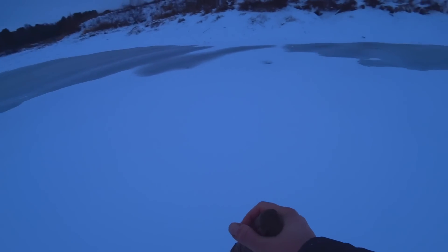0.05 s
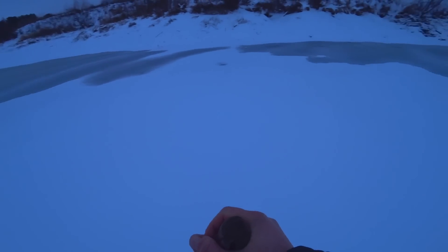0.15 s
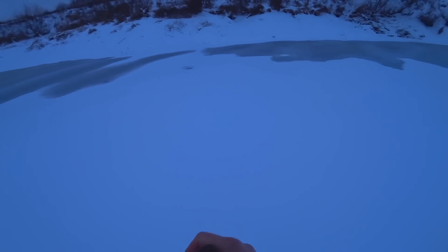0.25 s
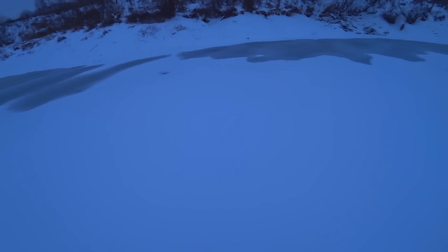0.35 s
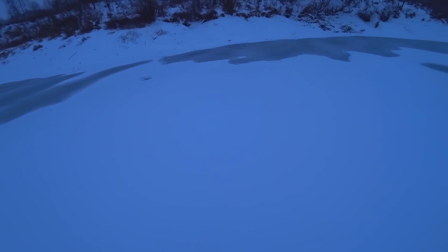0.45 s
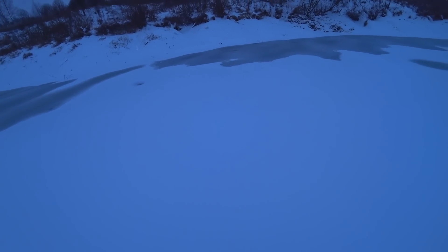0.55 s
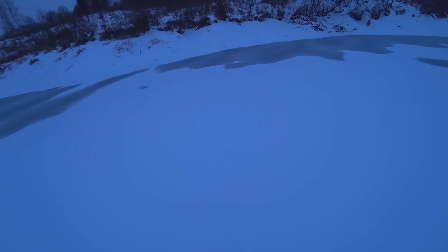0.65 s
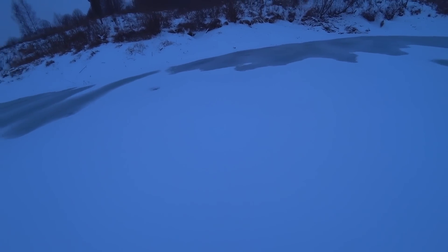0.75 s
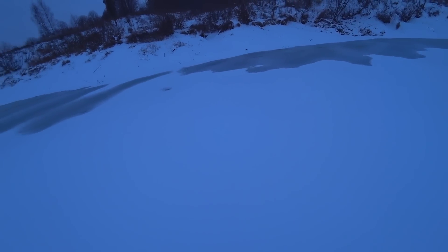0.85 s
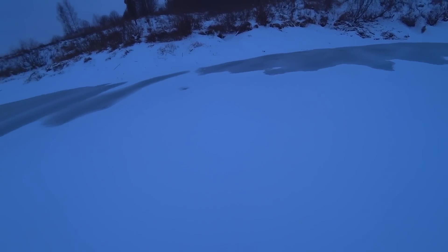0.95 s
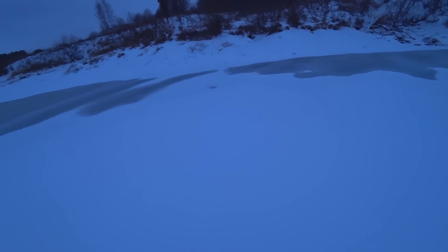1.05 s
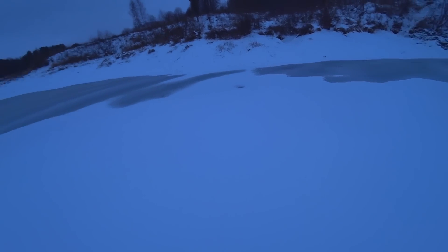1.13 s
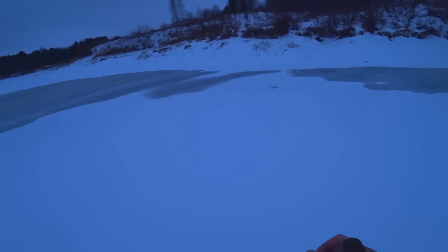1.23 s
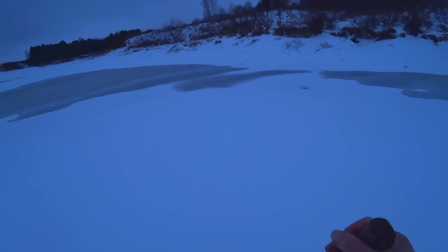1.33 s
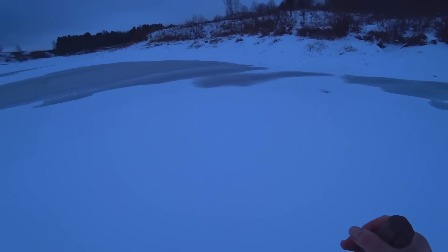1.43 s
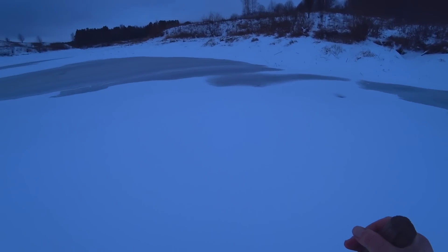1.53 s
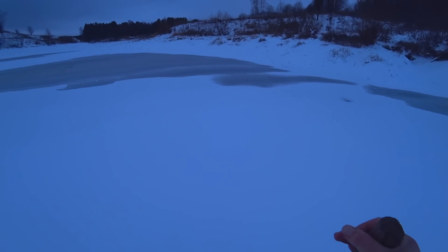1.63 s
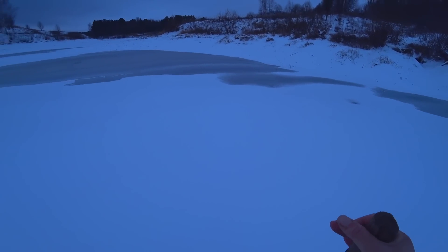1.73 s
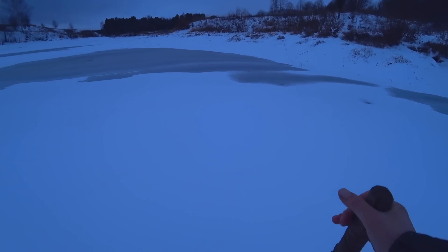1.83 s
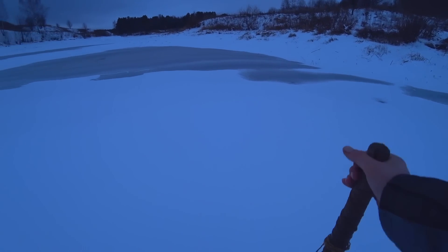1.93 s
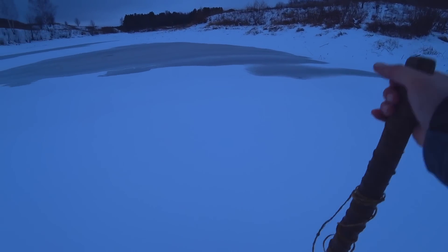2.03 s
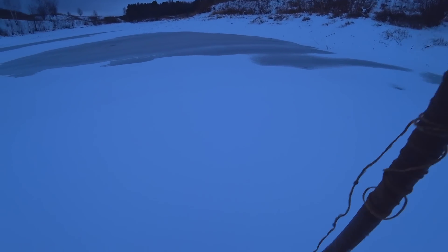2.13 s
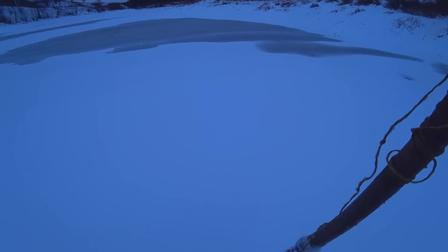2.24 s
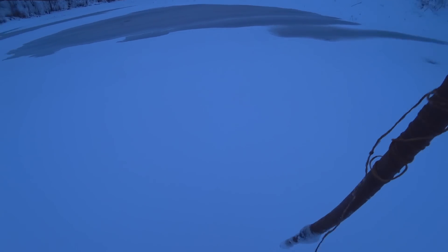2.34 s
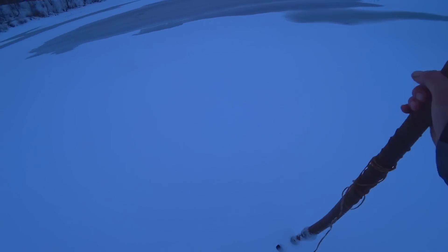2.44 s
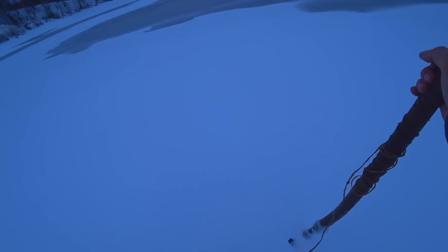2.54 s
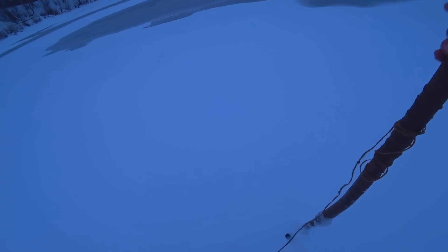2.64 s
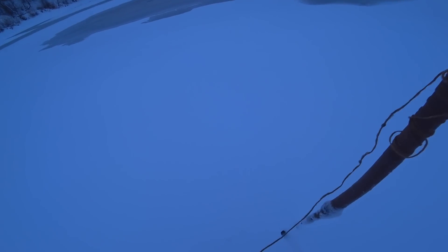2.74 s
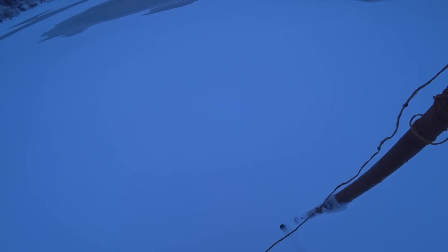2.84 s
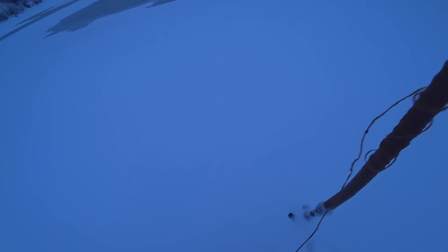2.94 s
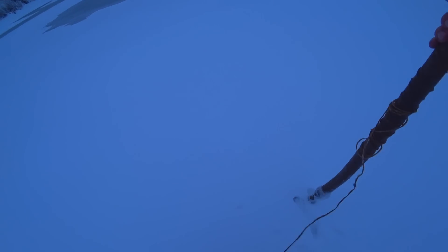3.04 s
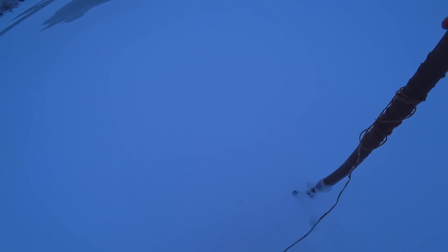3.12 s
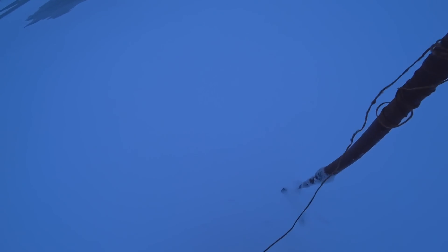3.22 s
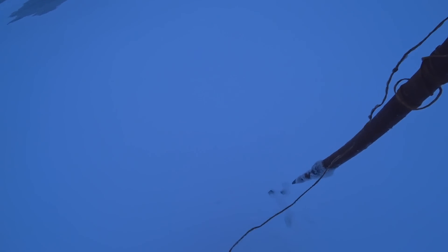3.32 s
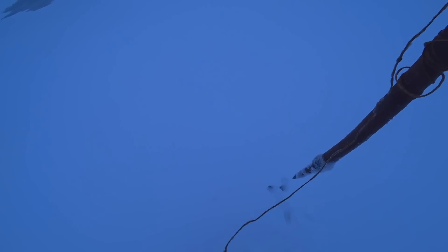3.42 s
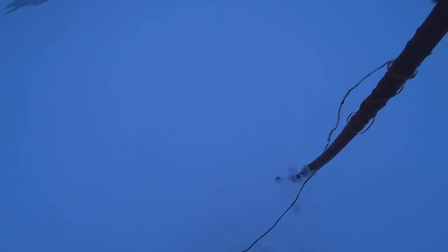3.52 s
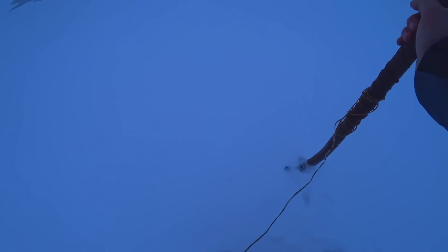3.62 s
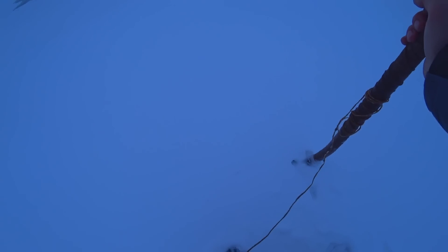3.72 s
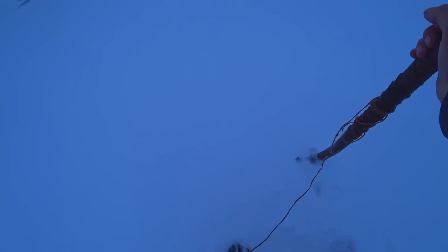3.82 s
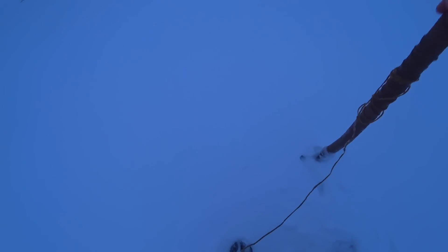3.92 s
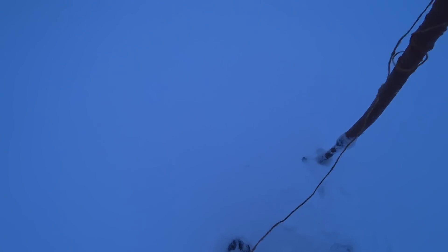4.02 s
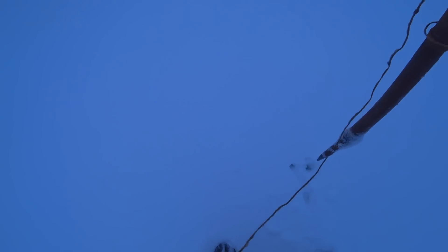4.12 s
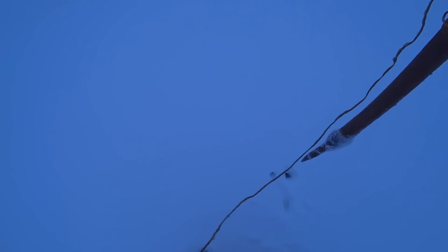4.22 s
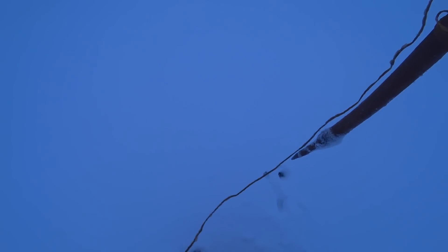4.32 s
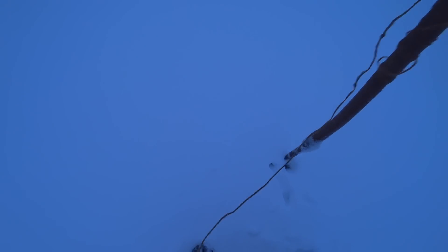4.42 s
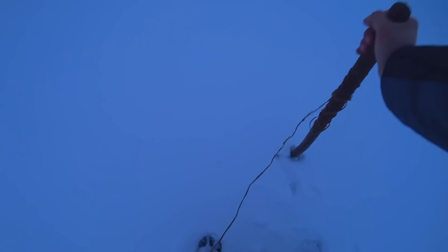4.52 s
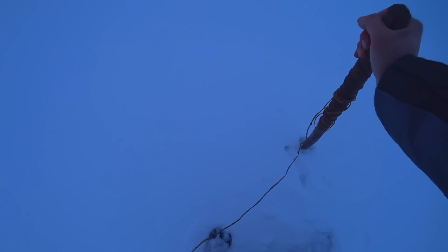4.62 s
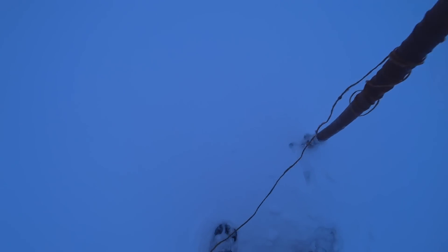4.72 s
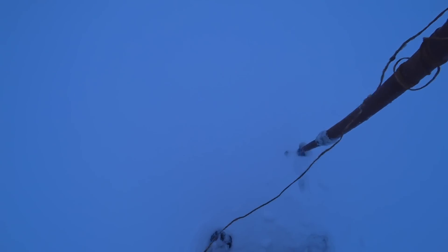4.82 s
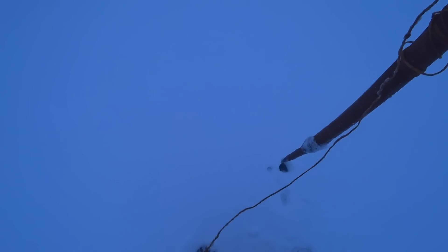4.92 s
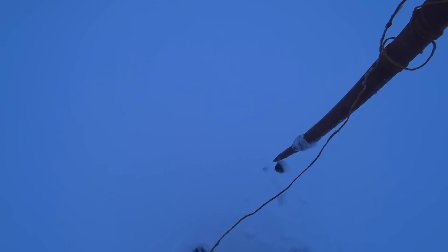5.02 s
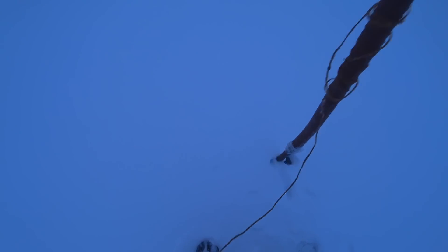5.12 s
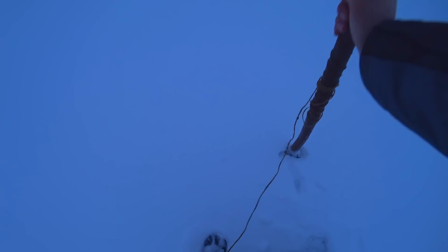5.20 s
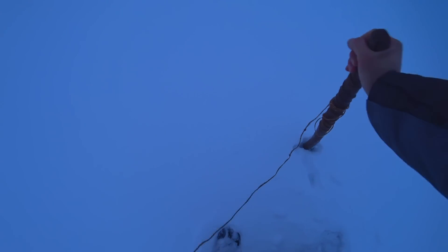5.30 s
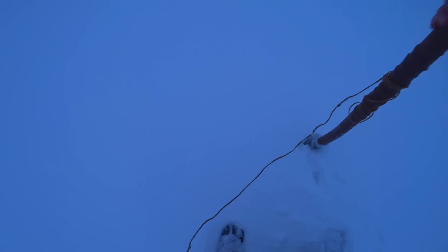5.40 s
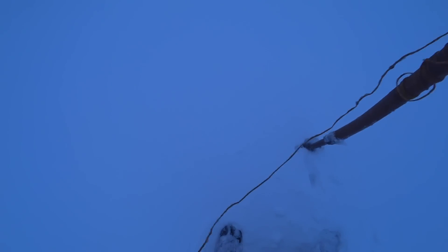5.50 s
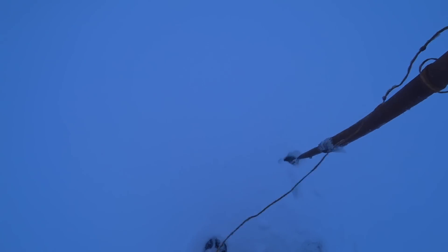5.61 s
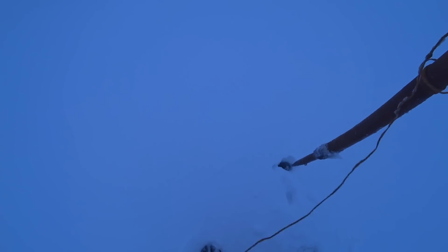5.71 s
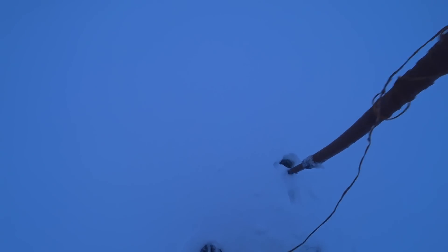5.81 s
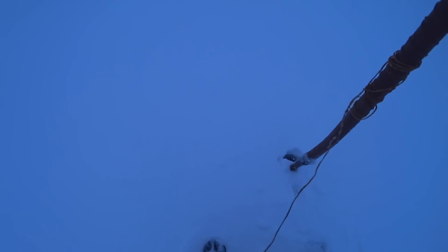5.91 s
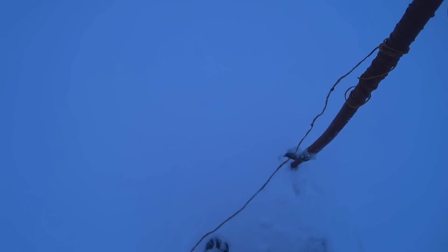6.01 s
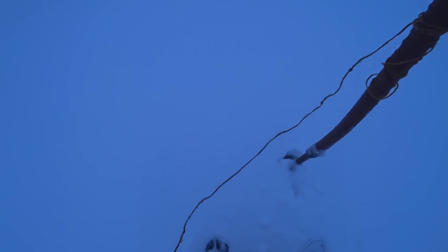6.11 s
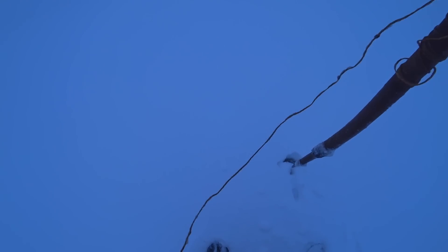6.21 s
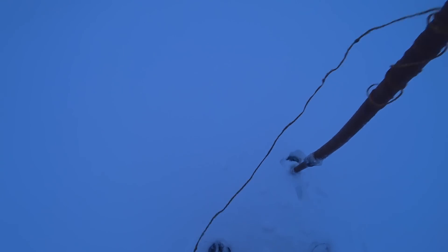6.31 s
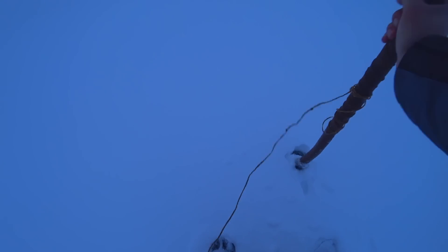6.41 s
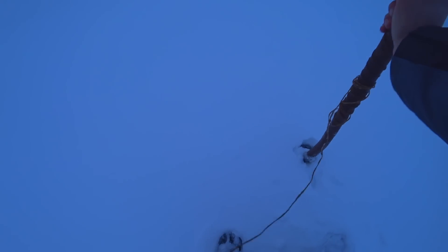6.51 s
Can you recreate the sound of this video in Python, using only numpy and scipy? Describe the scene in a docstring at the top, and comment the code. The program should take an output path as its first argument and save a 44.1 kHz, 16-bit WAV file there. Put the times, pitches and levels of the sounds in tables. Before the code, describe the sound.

A steel ice chisel on a wooden pole strikes snow-covered ice, close and dry, with no echo. The first sharp crack comes at about 0.4 seconds. For the next two seconds things are quieter: boots shuffle and pop in packed snow, sleeves swish with faint whistling rubs, and a brittle ice tick snaps near 0.9 seconds. Seven more blows follow at about 2.5, 3.0, 3.6, 4.5, 5.2, 5.9 and 6.4 seconds. These strikes are the loudest sounds, each a bright crack with a wooden knock, a short low thud in the ice sheet and a gritty grind through chips and snow. The steel squeaks briefly in its hole around 3.6, 4.8, 5.5 and 6.4 seconds. Snow pops and small ice ticks fill the gaps, with a stronger pop at 3.8 seconds. Soft clothing rustle and a light low rumble of air on the body-worn microphone continue throughout.

```python
"""On a snow-covered frozen lake, a steel ice chisel on a wooden pole strikes eight times, close and dry.
Each blow cracks the surface, thuds into the sheet and grinds on through chips and snow; the steel
squeaks in its hole. Between blows packed snow pops under boots, the ice ticks, winter clothes swish
and light air rumbles over a body-worn microphone."""
import sys
import numpy as np
from scipy import signal
from scipy.fft import rfft, irfft, next_fast_len
from scipy.io import wavfile
from scipy.ndimage import uniform_filter1d, map_coordinates

SR = 44100
rng = np.random.default_rng(int(sys.argv[2]) if len(sys.argv) > 2 else 0)


def int16_out(signal):
    """Quantize to a 16-bit WAV file."""
    q = np.round(np.clip(np.atleast_2d(signal).T, -1, 1) * 32767)
    wavfile.write(sys.argv[1], SR, q.astype(np.int16))


N = 289005
TIME = np.arange(N) / SR
AGE = np.arange(SR // 6) / SR  # time inside one short sound

# chisel blows: t/s, crack level/dB, crack length/s, ring f/Hz, knock level/dB, knock f/Hz,
# splinter lift/dB, rebound delay/s, pan/dB, slide level/dB, slide length/s, thud level/dB, thud f/Hz
BLOWS = [(0.3584, -13, 0.003, 2460, -13.5, 1470, -1, .0019, -0.5, -43, .045, -33, 205),
         (2.4662, -15.5, 0.0088, 3240, -20, 810, -2, .0024, -7, -31, .018, -27, 263),
         (2.996, -20, 0.011, 3780, -26, 756, -6.5, .00184, -14, -25, .039, -19.5, 172.6),
         (3.5573, -14, 0.0085, 2660, -20.5, 790, -3, .00255, -8, -22.5, .06, -33, 340),
         (4.497, -15.5, 0.013, 3280, -17.5, 760, -2.5, .00183, -6.5, -23.5, .03, -19, 282),
         (5.1768, -14, 0.0082, 1960, -19.5, 563, 1.5, .00175, -7.5, -21.5, .04, -29, 273.4),
         (5.8774, -14.5, 0.006, 2560, -18, 770, 3.5, .0011, -7.5, -31, .055, -15, 192),
         (6.3685, -16.5, 0.009, 1810, -20.5, 1070, 1.5, .00153, -8, -24.5, .078, -17.5, 222)]
# spectra of bright ice grit and of dull crushed snow: f/Hz, level/dB
GRIT_SPECTRUM = [(300, -3.5), (900, -2.5), (1400, -5.5), (2500, 4), (3300, -1.5), (4500, -2.5), (6500, -7),
                 (8500, -14), (11000, -14)]
CRUSH_SPECTRUM = [(50, -23.5), (170, 3), (400, -1), (650, 7), (1100, -7.5), (1500, -7.5), (3000, -33)]
# how hard the boots shuffle: t/s, level/dB
SHUFFLING = [(0.0, -53), (0.31, -58.5), (0.84, -60.5), (1.17, -54), (1.81, -56.5), (2.39, -53), (2.7, -60),
             (3.7, -53), (4.47, -57), (4.67, -51.5), (4.94, -59), (5.18, -59.5), (5.38, -50), (5.69, -62),
             (5.89, -62), (5.98, -55.5), (6.38, -60.5), (6.55, -50.5)]


def amp(db):
    """Decibels to gain."""
    return 10 ** (np.asarray(db) / 20)


def rms(x):
    """Root mean square."""
    return np.sqrt(np.mean(x ** 2) + 1e-20)


def unit(x):
    """Scaled to rms 1."""
    return x / rms(x)


def along(points, hz):
    """An EQ curve: (Hz, value) points read on a log axis."""
    f, values = np.transpose(points)
    return np.interp(np.log(hz + 1), np.log(f), values)


def fader(points):
    """A gain for every sample from (s, dB) points."""
    return amp(np.interp(TIME, *np.transpose(points)))


def decay(t60):
    """An envelope that falls 60 dB in t60 seconds."""
    return amp(-60 * AGE / t60)


def sine(hz):
    """A sine that follows a pitch curve."""
    return np.sin(2 * np.pi * np.cumsum(hz) / SR)


def wobble(rate):
    """A smooth random curve, rate knots a second."""
    return map_coordinates(rng.standard_normal(N // 50), [TIME * rate], mode="mirror")


def surge(s, db, half):
    """The power of a push that swells and ebbs around time s."""
    power = np.zeros(N)
    near = slice(*np.searchsorted(TIME, [s - 10 * half, s + 10 * half]))
    power[near] = amp(db) ** 2 / np.cosh((TIME[near] - s) / half) ** 2
    return power


def bump(hz, centre, width):
    """A resonance peak of height 1."""
    return 1 / (1 + (2 * (hz - centre) / width) ** 2)


def filtered(x, response):
    """x times a response of frequency."""
    n = x.shape[-1]
    padded = next_fast_len(n + SR // 10)
    return irfft(rfft(x, padded) * response(np.fft.rfftfreq(padded, 1 / SR)), padded)[..., :n]


def coloured(x, shape_db, size=4096):
    """x through a minimum-phase filter of unit energy with the given dB shape."""
    cepstrum = irfft(np.log(amp(shape_db(np.fft.rfftfreq(size, 1 / SR)))))
    cepstrum[1:size // 2] *= 2
    cepstrum[size // 2 + 1:] = 0
    kernel = irfft(np.exp(rfft(cepstrum)))
    return signal.fftconvolve(x, kernel / np.linalg.norm(kernel))[:len(x)]


def fractures(envelope, spread_db):
    """Dense tiny breaks of very unequal size, carrying the envelope's energy."""
    n = len(envelope)
    noise = envelope * rng.standard_normal(n)
    sizes = amp(spread_db * np.repeat(rng.standard_normal(n // 20 + 1), 20)[:n])
    return unit(noise * sizes) * rms(envelope)


def rush(spectrum, width, grain_db):
    """Grainy stereo noise of rms 1; width is the gain of side against mid."""
    mid = coloured(fractures(np.ones(N), grain_db), lambda hz: along(spectrum, hz))
    side = coloured(fractures(np.ones(N), grain_db), lambda hz: along(spectrum, hz))
    return unit(np.array([mid + width * side, mid - width * side]))


def placed(x, pan_db, lag_rad=1.0, shadow_hz=900, scatter=0.1):
    """Pans (+ is left) by the body's shadow; the left treble lags and each side scatters a little."""
    shade = [(150, 0.24), (500, -0.5), (1000, 0.069), (2000, 0.5), (4000, 1.25), (8000, 1.1), (11000, 0.38)]  # body shadow: f/Hz, factor on the pan
    sides = np.array([[1], [-1]])

    def shadow(hz):
        treble = hz ** 4 / (hz ** 4 + shadow_hz ** 4)
        return amp(sides * pan_db * along(shade, hz) / 2) * np.exp(-1j * sides * lag_rad * treble / 2)

    glints = rng.standard_normal((2, len(AGE))) * decay(0.02)
    glints /= np.linalg.norm(glints, axis=1, keepdims=True)
    return filtered(x, shadow) + scatter * signal.fftconvolve(x[None], glints, axes=1)[:, :len(x)]


def add(track, s, sound):
    """Lays a sound into the track at time s."""
    start = max(round(s * SR), 0)
    track[:, start:start + sound.shape[-1]] += sound[..., :max(N - start, 0)]


def air_rumble(trim_db=4, lump_db=2.5, jolt_db=-38.5, jolt_rise_s=0.02, jolt_t60=0.37):
    """Air rolls over the microphone in lumps, and each blow jolts it."""
    breeze = [(0.0, -68), (0.47, -69), (0.64, -61.5), (1.2, -61), (1.53, -50), (1.92, -56), (3.39, -72),
              (3.67, -64), (4.32, -67), (4.49, -60), (5.07, -67.5), (5.31, -48.5), (5.67, -67.5),
              (6.55, -50.5)]  # strength of the air: t/s, level/dB
    spectrum = [(8, -4.5), (25, 6), (55, -2.5), (100, -6.5), (250, -39)]  # low buffeting: f/Hz, level/dB
    air = fader(breeze) * amp(trim_db) * unit(amp(lump_db * wobble(rate=16)))
    ages = [np.maximum(TIME - s, 0) for s, *_ in BLOWS]
    jolts = sum((1 - np.exp(-age / jolt_rise_s)) * amp(jolt_db - 60 * age / jolt_t60) for age in ages)
    return np.hypot(air, jolts) * rush(spectrum, width=0.13, grain_db=2.0)


def clothes(rustle_trim_db=2.9, swish_trim_db=2.5, pan_db=-3):
    """Winter cloth rustles, and swishes as a sleeve sweeps across the jacket."""
    rustling = [(0.0, -55.5), (0.22, -53.5), (0.36, -62), (0.97, -70.5), (1.11, -56.5), (1.29, -61.5),
                (1.55, -64.5), (2.26, -55.5), (2.41, -58), (2.61, -58.5), (2.96, -62.5), (3.14, -56.5),
                (3.3, -59), (3.52, -56.5), (3.74, -56), (4.49, -57.5), (4.67, -52), (4.89, -58),
                (5.14, -60), (5.34, -49), (5.6, -56.5), (5.84, -62), (6.0, -53), (6.16, -59.5), (6.38, -62),
                (6.55, -56.5)]  # bed of rustle: t/s, level/dB
    sweeps = [(0.165, -48.5, 0.034), (0.662, -54, 0.075), (1.012, -52.5, 0.063), (1.896, -55, 0.052),
              (2.445, -52, 0.081), (2.958, -50, 0.031), (4.246, -54.5, 0.031), (6.086, -57, 0.043)]  # sleeve sweeps: peak t/s, level/dB, half length/s
    spectrum = [(400, -9.5), (1200, 3), (2200, -1.5), (3400, -1), (5500, -6), (7500, -5.5), (11000, -12)]  # rubbing cloth: f/Hz, level/dB
    rustle = (fader(rustling) * amp(rustle_trim_db)) ** 2
    swishes = sum(surge(s, db + swish_trim_db, half) for s, db, half in sweeps)
    balance = amp([[pan_db / 2], [-pan_db / 2]])
    return np.sqrt(rustle + swishes) * rush(spectrum, width=0.94, grain_db=2.0) * balance


def sleeve_whistles(flutter=0.02):
    """Ribs of cloth slide over each other; pitch follows the arm's speed."""
    glides = [(0.049, .16, 238, 290, 310, -47), (0.60, 0.095, 471, 526, 610, -53.5),
              (0.799, 0.079, 423, 375, 340, -56), (1.09, 0.071, 563, 503, 490, -52)]  # sleeve glides: t/s, length/s, start f/Hz, middle f/Hz, end f/Hz, level/dB
    out = np.zeros((2, N))
    for s, length, first_hz, middle_hz, last_hz, db in glides:
        progress = np.linspace(0, 1, int(length * SR))
        pitch = np.polyval(np.polyfit([0, .5, 1], [first_hz, middle_hz, last_hz], 2), progress)
        pitch *= 1 + flutter * unit(uniform_filter1d(rng.standard_normal(len(pitch)), size=200))
        add(out, s, amp(db) * np.sqrt(2) * np.sin(np.pi * progress) * sine(pitch))
    return out


def boots(trim_db=2.45):
    """Boots shuffle in the snow with a dull, grainy scuff."""
    spectrum = [(30, -16), (100, -5.5), (200, -0.5), (400, -2), (700, -6), (1300, -12.5), (2500, -23.5),
                (6000, -60)]  # scuffed snow: f/Hz, level/dB
    return fader(SHUFFLING) * amp(trim_db) * rush(spectrum, width=0.51, grain_db=3.5)


def ice_ticks(end_hz=680, sweep_hz=2500, sweep_s=0.00126, snap_lift_db=10, chirp_trim_db=-5):
    """A bright snap, then a chirp that falls because short bending waves outrun long ones."""
    ticks = [(0.935, -25.5, 8100, -9, 1), (1.292, -41, 7950, 5.5, 5), (2.604, -36.5, 5900, -6, -11),
             (2.923, -33, 2795, -7, 0), (3.131, -34.5, 7400, -5, -4), (3.665, -28, 3270, -10, 21.5),
             (4.663, -32, 1975, -12, -6), (4.724, -31, 1810, -2, -5), (5.058, -44.5, 4090, -19, -19),
             (5.664, -38.5, 5230, -17, -5), (5.8355, -31.5, 3286, -19, -14)]  # brittle ticks: t/s, level/dB, snap f/Hz, relative chirp level/dB, pan/dB
    spectrum = [(300, 2), (1500, 0.5), (3200, -7), (5000, -12.5), (8000, -10), (11000, -26)]  # snapping ice: f/Hz, level/dB
    chirp = sine(end_hz + sweep_hz / (1 + AGE / sweep_s) ** 1.62) * decay(0.072)
    out = np.zeros((2, N))
    for s, db, snap_hz, chirp_db, pan_db in ticks:
        breaks = fractures(decay(0.0087), spread_db=12.0)
        snap = coloured(breaks, lambda hz: along(spectrum, hz) + snap_lift_db * bump(hz, snap_hz, 1400))
        add(out, s, placed(amp(db) * (snap + amp(chirp_db + chirp_trim_db) * chirp), pan_db))
    return out


def faint_pops(count=16, db=-39, centre_hz=474, spread_octaves=0.41):
    """Cues (s, dB, Hz) for small random pops, more likely while the boots shuffle."""
    chance = np.cumsum(fader(SHUFFLING) ** 2)
    times = np.interp(rng.random(count), chance / chance[-1], TIME)
    pitches = centre_hz * 2 ** (spread_octaves * rng.standard_normal(count))
    return [(s, db, hz) for s, hz in zip(times, pitches)]


def snow_pops(cycles=0.44, lead_s=0.004, grit_db=-25, settle_db=-11, settle_hz=205, dull_hz=600):
    """Packed snow gives way in gritty pops of about one cycle; under the duller ones it also settles."""
    loud_pops = [(0.541, -34.5, 281), (0.569, -28.5, 358), (1.228, -24.5, 405), (1.395, -33, 362),
                 (1.478, -28, 535), (1.51, -34, 386), (1.94, -28.5, 1100), (2.131, -28.5, 432),
                 (2.182, -28.5, 880), (2.224, -31, 360), (2.85, -33.5, 1000), (2.941, -26, 1114),
                 (2.967, -26.5, 1104), (3.217, -27, 873), (3.427, -34.5, 356), (3.76, -34.5, 805),
                 (3.802, -19.5, 980), (3.821, -32, 880), (4.043, -27, 795), (4.055, -29.5, 770),
                 (4.438, -32.5, 344), (4.641, -25, 657), (4.673, -28, 785), (4.852, -32.5, 447),
                 (5.435, -22.5, 800), (6.025, -22.5, 1090)]  # single collapses of snow: t/s, level/dB, f/Hz
    since = np.maximum(AGE - lead_s, 0)
    tail = (1 - np.exp(-since / 0.00023)) * amp(-60 * since / 0.045)
    out = np.zeros((2, N))
    for s, db, pop_hz in list(loud_pops) + faint_pops():
        turns = (AGE - lead_s) * pop_hz
        pulse = np.cos(2 * np.pi * turns + rng.uniform(-1, 1)) * np.exp(-np.abs(turns / cycles) ** 1.46)
        grit = coloured(fractures(tail, spread_db=15.5), lambda hz: along(GRIT_SPECTRUM, hz))
        low_tone = np.sin(2 * np.pi * settle_hz * rng.uniform(0.66, 1.82) * since)
        settle = 2 * tail * low_tone / (1 + (pop_hz / dull_hz) ** 2)
        add(out, s - lead_s, amp(db) * (pulse + amp(grit_db) * grit + amp(settle_db) * settle))
    return out


def sheet_thuds(lag_s=0.00376, rise_s=0.0017, rumble_t60=0.079, sag=0.16, sag_s=0.0049):
    """The sheet bends under each blow or weight: higher waves come first, over a short, low rumble."""
    weights = [(0.383, -29.5, 180), (1.229, -37, 200), (1.511, -32, 172), (2.474, -27, 525),
               (3.658, -35, 396), (3.933, -33.5, 274), (3.989, -27.5, 233), (4.588, -26, 243),
               (5.301, -23, 168), (6.417, -25, 209.6)]  # a boot or the pole settles on the ice: t/s, level/dB, f/Hz
    # rumble of a 220 Hz thud, shifted with each pitch: f/Hz, level/dB
    spectrum = [(20, 3), (110, -13), (200, 3), (500, -9), (1200, -25.5), (4000, -64)]
    strikes = [(s + lag_s, db, thud_hz) for s, *_, db, thud_hz in BLOWS]
    attack = 1 - np.exp(-AGE / rise_s)
    out = np.zeros((2, N))
    for s, db, thud_hz in strikes + list(weights):
        tone = sine(thud_hz * (1 + sag * np.exp(-AGE / sag_s))) * decay(0.6 * rumble_t60)
        noise = coloured(rng.standard_normal(len(AGE)), lambda hz: along(spectrum, hz * 220 / thud_hz))
        rumble = unit(noise) * decay(rumble_t60)
        add(out, s, amp(db) * attack * (1.08 * tone + 0.54 * rumble))
    return out


def steel_squeaks():
    """The steel rubs in its hole: uneven slips feed one narrow resonance per squeak."""
    rubs = [(3.598, -36, 0.016, 2828, 200), (3.794, -54, .03, 2720, 300), (3.959, -46.5, 0.024, 2650, 300),
            (4.758, -41.5, 0.0051, 3200, 610), (4.811, -45.5, 0.012, 2580, 720),
            (5.482, -30, .005, 2860, 403), (5.491, -38, 0.0027, 3250, 600),
            (6.445, -37.5, 0.024, 1110, 120), (6.464, -45, 0.02, 3040, 396)]  # steel on ice: peak t/s, level/dB, half length/s, f/Hz, width/Hz
    out = np.zeros(N)
    for s, db, half, centre_hz, width_hz in rubs:
        power = surge(s, db, half)
        rubbing = power > 0
        slips = fractures(np.sqrt(power[rubbing]), spread_db=4)
        out[rubbing] += coloured(slips, lambda hz: 12 * np.log10(bump(hz, centre_hz, width_hz)))
    return placed(out, pan_db=-5)


def chisel_eq(hz):
    """The dB colour of the tool's modes, damped by hand and ice."""
    modes = [(1119, 246, 12), (1740, 350, 7.5), (2060, 450, 3.5), (2690, 100, 4.5), (3047, 150, 4.5),
             (3950, 540, -1.5), (4570, 570, 2.5), (5360, 300, -3.5), (8080, 320, 9)]  # resonances of the tool: f/Hz, width/Hz, lift/dB
    return sum(db * bump(hz, centre, width) for centre, width, db in modes)


def ice_chips(power, count=450, centre_hz=2500, pitch_spread=0.548, cycles_per_30_db=9):
    """Larger chips break off, more often under a hard push; each rings briefly at its own pitch."""
    chance = power ** .25
    starts = rng.choice(N, count, p=chance / chance.sum())
    pitch = np.clip(centre_hz * np.exp(pitch_spread * rng.standard_normal((count, 1))), 500, 10000)
    samples = np.arange(512)
    turns = pitch * samples / SR
    sizes = np.sqrt(power[starts, None]) * rng.exponential(size=(count, 1))
    grains = sizes * np.sin(2 * np.pi * turns) * amp(-30 * turns / cycles_per_30_db)
    out = np.bincount((starts[:, None] + samples).ravel(), grains.ravel(), N)[:N]
    return unit(out) * np.sqrt(power.mean())


def blade_slide(s, db, length, rise_s=0.012, fade_db_per_s=80):
    """The power of the blade's run into the ice: it builds, fades as the blade slows, and stops."""
    age = np.maximum(TIME - s, 0)
    envelope = amp(db - fade_db_per_s * age) * (1 - np.exp(-age / rise_s))
    return envelope ** 2 / (1 + (age / length) ** 8)


def blade_crunch(jerk_db=1.77, grit_db=-1.5, chips_db=-4):
    """The blade grinds on in stick-slip jerks; grit and crushed snow sound through the tool."""
    # the pole is leant on and bites deeper: peak t/s, level/dB, half length/s, relative crush level/dB
    shoves = [(3.027, -30, .006, -9), (3.6, -29, .01, -23), (3.988, -46, .03, -1), (4.575, -34, .018, -2),
              (4.727, -40.5, .005, 2), (5.255, -38, .022, -3), (5.298, -32, .0083, -4),
              (5.476, -36, .005, -7), (5.928, -36.5, .005, -16), (6.41, -24, .0043, -15)]
    pushes = [(surge(s, db, half), crush_db) for s, db, half, crush_db in shoves]
    for s, *_, slide_db, slide_s, _thud_db, _thud_hz in BLOWS:
        pushes.append((surge(s - 0.003, db=-46, half=0.007), -4))  # faint gritty lead-in to the blow
        pushes.append((blade_slide(s, slide_db, slide_s), -4))
        pushes.append((surge(s + 0.14, db=-55.5, half=0.009), 4.5))  # pulls free with a soft crush
    jerks = unit(amp(jerk_db * wobble(rate=220))) ** 2
    grind = jerks * sum(power for power, _ in pushes)
    crush = jerks * sum(power * amp(crush_db) ** 2 for power, crush_db in pushes)
    grit = coloured(fractures(np.sqrt(grind), spread_db=2.5),
                    lambda hz: along(GRIT_SPECTRUM, hz) + 0.75 * chisel_eq(hz))
    snow = coloured(fractures(np.sqrt(crush), spread_db=4.5),
                    lambda hz: along(CRUSH_SPECTRUM, hz) + chisel_eq(hz))
    return placed(amp(grit_db) * grit + snow + amp(chips_db) * ice_chips(grind), pan_db=-6)


def surface_crack(length, ring_hz, splinter_db, rebound_s, ring_db=6, break_s=0.001032, rebound=0.26):
    """The ice gives way in one break and shatters for a few ms; the bouncing blade repeats the crack."""
    spectrum = [(300, -52), (900, -14), (1400, -10), (1900, -2), (3200, 0), (4800, -3), (6500, -8.5),
                (8500, -15), (11000, -23)]  # shattering ice: f/Hz, level/dB
    force = (1 - np.exp(-AGE / 0.00048)) / np.sqrt(1 + (AGE / length) ** 6.8)
    breaks = fractures(force, spread_db=4.5)
    breaks[round(break_s * SR)] += 0.49 * np.linalg.norm(force)  # the one big break

    def colour(hz):
        ring = ring_db * bump(hz, ring_hz, width=350)
        splinters = splinter_db * (1 + np.tanh((hz - 3900) / 1200)) / 2  # treble shelf
        return along(spectrum, hz) + 0.64 * chisel_eq(hz) + ring + splinters

    crack = coloured(breaks, colour)
    bounced = filtered(crack, lambda hz: 1 + rebound * np.exp(-2j * np.pi * hz * rebound_s))
    return unit(bounced) * rms(force)


def pole_knock(length, knock_hz, rise_s=0.0015, lift_db=8):
    """The wooden pole knocks: a duller burst with one resonance lifted."""
    force = (1 - np.exp(-AGE / rise_s)) / np.sqrt(1 + (AGE / (0.92 * length)) ** 4.8)
    colour = lambda hz: along(CRUSH_SPECTRUM, hz) + chisel_eq(hz) + lift_db * bump(hz, knock_hz, 200)
    return unit(coloured(fractures(force, spread_db=8.0), colour)) * rms(force)


def chisel_blows():
    """The edge bites: each hit layers the crack of the ice with the knock of the pole."""
    out = np.zeros((2, N))
    for s, crack_db, length, ring_hz, knock_db, knock_hz, splinter_db, rebound_s, pan_db, *_ in BLOWS:
        crack = amp(crack_db) * surface_crack(length, ring_hz, splinter_db, rebound_s)
        knock = amp(knock_db) * pole_knock(length, knock_hz)
        add(out, s, placed(crack + knock, pan_db))
    return out


def scene():
    """Open snow gives no echo: everything is close and dry."""
    chiselling = chisel_blows() + blade_crunch() + steel_squeaks() + sheet_thuds()
    return chiselling + snow_pops() + ice_ticks() + sleeve_whistles() + clothes() + boots() + air_rumble()


def record(dry, ceiling=0.85, top_hz=11060):
    """A soft clip rounds the highest peaks, then a steep low-pass cuts the top."""
    rounded = dry / (1 + np.abs(dry / ceiling) ** 6) ** (1 / 6)
    return filtered(rounded, lambda hz: 1 / np.sqrt(1 + (hz / top_hz) ** 120))


dry = scene()
out = record(dry)
int16_out(out)
```